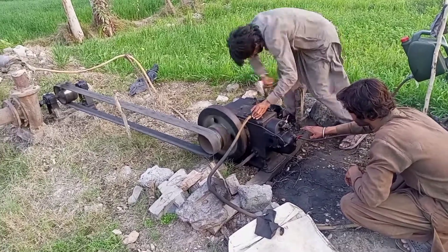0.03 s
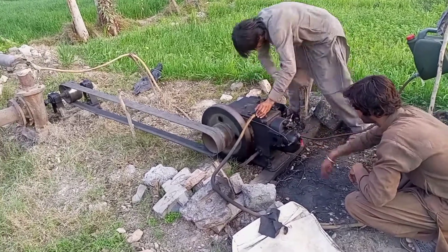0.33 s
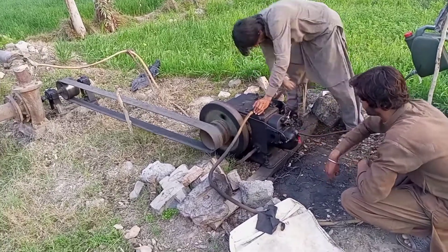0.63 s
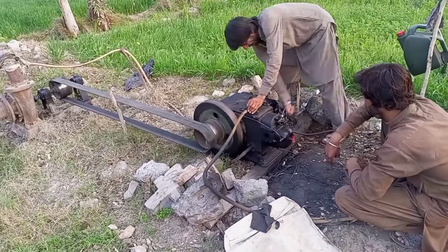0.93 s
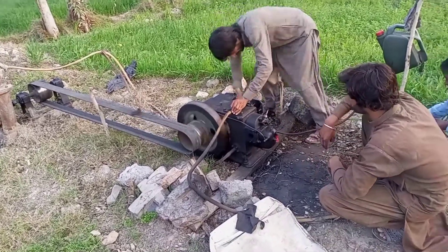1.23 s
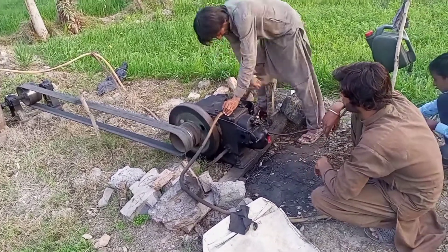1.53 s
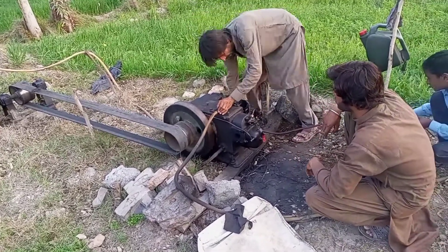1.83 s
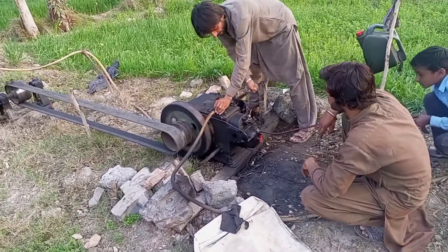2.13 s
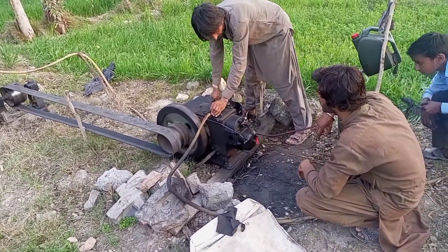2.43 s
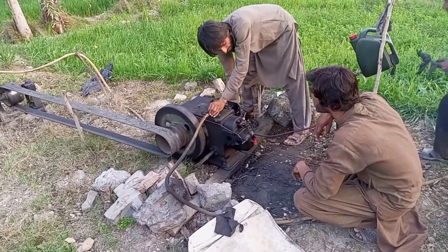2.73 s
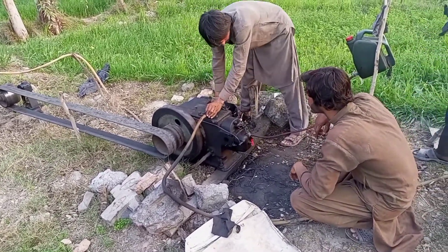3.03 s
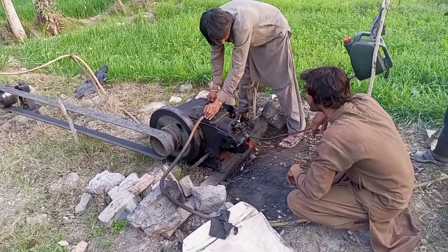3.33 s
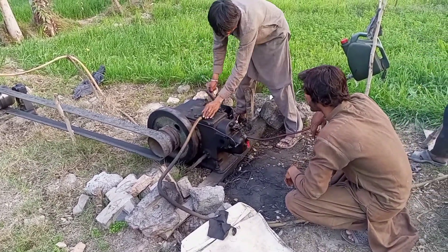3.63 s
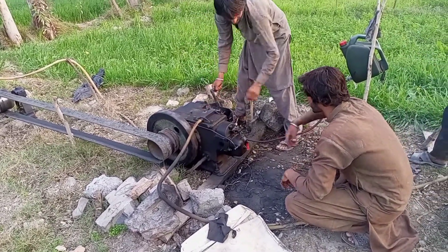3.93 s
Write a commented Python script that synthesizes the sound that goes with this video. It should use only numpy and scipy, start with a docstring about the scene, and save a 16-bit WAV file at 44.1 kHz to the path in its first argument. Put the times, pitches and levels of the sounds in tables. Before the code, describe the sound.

An old diesel engine turns over with hissing, rattling pulses, slows down and stalls.

```python
"""In a field, an old single-cylinder diesel turns over without firing, each cycle slower, and stalls
with a sharp puff and a low clunk. In every cycle air hisses and squeals past the valves, the exhaust
pipe thumps with a rising note, and loose parts knock and rattle. Now and then comes a hollow pop or
the squeak of a dry part. The flywheel scrapes faintly as it creeps to a stop; then only a faint
background hiss is left."""
import sys
import numpy as np
from scipy import signal
from scipy.fft import rfft, irfft
from scipy.io import wavfile
from scipy.ndimage import uniform_filter1d

SR = 44100
rng = np.random.default_rng(int(sys.argv[2]) if len(sys.argv) > 2 else 0)


def inscribe(sig):
    """Save sig as 16-bit PCM at rate SR to the path in sys.argv[1].

    A 1-D sig is mono; a 2-D sig holds one channel per row.
    Samples are clipped to [-1, 1] before scaling.
    """
    pcm = np.round(np.clip(np.atleast_2d(sig).T, -1, 1) * 32767)
    wavfile.write(sys.argv[1], SR, pcm.astype(np.int16))


N = 176400
T = np.arange(N) / SR

# how loudly the turning engine rattles (time [s], level [dB])
RATTLE_LEVEL = [(0, -25.5), (.9, -30), (1.12, -35.5), (1.3, -39), (1.52, -32.5), (1.8, -54), (2.05, -49.5),
                (2.25, -55), (2.7, -72.5)]
# tone of the rattle (frequency [Hz], level [dB])
RATTLE_TONE = [(270, -1.5), (600, -8.5), (1150, -1.5), (1500, -18.5), (2200, -13), (6000, -20),
               (15000, -38)]
# rushes of air (peak time [s], rise [s], fall [s], level [dB])
AIR_RUSHES = [(0.012, 0.018, 0.013, -14.5), (0.12, 0.006, 0.018, -15), (0.196, 0.002, 0.013, -11.5),
              (0.328, 0.014, 0.029, -12.5), (0.434, .005, 0.014, -22), (.475, 0.005, 0.055, -17.5),
              (.63, 0.029, 0.056, -13), (0.733, 0.011, 0.017, -13.5), (1.085, .022, 0.026, -17),
              (1.236, 0.0025, 0.02, -18.5), (1.517, 0.087, 0.025, -28.5), (1.667, 0.029, 0.03, -17.5),
              (1.891, 0.0083, 0.019, -20.5), (2.571, 0.003, 0.0099, -16.5)]
# tone of the rushing air (frequency [Hz], level [dB])
AIR_TONE = [(1600, -29.5), (2600, -12), (6000, -7), (10000, -5.5), (15500, -9.5)]
# knocks of loose parts (time [s], relative level [dB], extra level for the clink [dB])
KNOCKS = [(.010, -15.5, 1.5), (0.059, -14, 1), (0.12, -14.5, 0), (0.269, -12, -16), (0.432, -15, 2.5),
          (0.722, -8.5, -2), (0.809, -18, -28), (0.844, -11, -18.5), (0.855, -33, 18), (0.943, -11, -26),
          (0.983, -30, -5), (1.223, -13, -10), (1.33, -15.5, -10), (1.387, -19.5, 1.5), (1.486, -15.5, -10),
          (1.741, -28, -5.5), (1.768, -18.5, -40), (1.87, -23.5, 0.5), (2.022, -18, -39),
          (2.114, -27.5, 12), (2.277, -19, -1.5), (2.365, -46.5, 7), (2.572, -24.5, -14), (2.593, -22, -19),
          (2.715, -38, -36.5)]
# tone of a knock's dull body (frequency [Hz], level [dB])
BODY_TONE = [(290, -7.5), (620, -2.5), (1200, 4), (1550, -13.5), (2100, 1), (6000, -42.5)]
# tone of a knock's bright clink (frequency [Hz], level [dB])
CLINK_TONE = [(2100, -5), (3500, 2.5), (5500, -4), (15000, -27)]
# notes at which the iron casing rings (frequency [Hz], relative level [dB])
CASING_NOTES = [(640, -3.5), (1080, -7), (1276, 5), (2140, -10.5), (2490, 0.5), (3660, -4), (4280, -7.5)]
# harsh squeals at the valves, and last a faint whistling scrape (peak time [s], rise [s], fall [s], pitch [Hz],
# relative level [dB])
SQUEALS = [(.163, 0.0084, 0.02, 3570, -10), (.477, 0.0074, 0.034, 3613, -15),
           (.53, 0.022, .014, 3525, -17.5), (.712, 0.01, 0.019, 3080, -16.5),
           (1.358, 0.011, 0.021, 2930, -24.5), (1.4, 0.017, 0.033, 3704, -16),
           (1.461, 0.0038, 0.012, 3285, -16.5), (1.505, 0.034, 0.037, 3020, -21),
           (2.087, 0.011, 0.018, 2310, -36.5)]
# short hollow pops, then the low clunk of the stall (time [s], pitch [Hz], level [dB], fade time [s])
POPS_AND_CLUNK = [(0.1949, 926, -6, 0.0054), (1.138, 784, -26, 0.021), (2.575, 262, -23, .012),
                  (2.587, 347, -25.5, 0.0086)]
# thin squeaks of a dry part (peak time [s], rise [s], fall [s], pitch [Hz], relative level [dB])
SQUEAKS = [(.238, 0.015, 0.041, 6810, -15), (.552, 0.028, 0.056, 6780, -13),
           (.964, .014, 0.0085, 6790, -23), (1.005, 0.017, 0.035, 6710, -13.5),
           (1.973, 0.0095, 0.037, 6960, -22), (2.037, 0.018, 0.031, 6810, -24)]
# exhaust thumps (time [s], level [dB], time the note takes to rise [s], level of the held note [dB])
THUMPS = [(0.337, -7, 0.038, -22), (0.741, -8, 0.13, -58), (1.245, -8.5, 0.086, -26.5),
          (1.894, -10.5, 0.15, -23.5)]
# scrapes of the flywheel (peak time [s], rise [s], fall [s], level [dB])
SCRAPES = [(2.256, 0.011, 0.02, -37), (2.54, 0.029, 0.098, -41.5), (2.803, 0.017, 0.018, -56.5)]
# tone of the scrapes (frequency [Hz], level [dB])
SCRAPE_TONE = [(2500, -14), (4800, 2), (8000, -16), (15000, -20)]
# tone of the background hiss (frequency [Hz], level [dB])
BACKGROUND_TONE = [(105, 0), (300, -21), (1250, -10), (7000, -30), (10000, -24.5), (15000, -40)]
# the background hiss, with a small swell from the recorder's gain (time [s], level [dB])
BACKGROUND_LEVEL = [(2.86, -58.5), (2.92, -55), (4, -61)]


def gain(db):
    """Turn decibels into a number to multiply by."""
    return 10 ** (np.asarray(db) / 20)


def unit(x):
    """Scale a signal to an average strength (rms) of 1."""
    return x / np.sqrt(np.mean(x ** 2))


def noise():
    """A plain, even hiss: white noise."""
    return rng.standard_normal(N)


def colour(x, tone):
    """Shape x by a tone table, fading out below its lowest frequency; strength 1."""
    hz, db = np.array(tone).T
    freqs = np.maximum(np.arange(N // 2 + 1) * SR / N, 1)
    curve = gain(np.interp(np.log(freqs), np.log(hz), db))
    bass_cut = np.minimum(freqs / hz[0], 1) ** 2
    return unit(irfft(rfft(x) * curve * bass_cut, N))


def wobble(per_s):
    """A smooth random curve of strength 1 that changes about per_s times a second."""
    width = max(int(SR / per_s), 1)
    return unit(uniform_filter1d(uniform_filter1d(noise(), width), width))


def flutter(db, per_s):
    """A quick flicker of loudness, at most db up or down."""
    return gain(db * np.tanh(wobble(per_s)))


def fader(levels):
    """A loudness curve through a table of times and levels."""
    return gain(np.interp(T, *np.array(levels).T))


def strike(start, attack, decay):
    """The loudness of a hit: a straight climb, then a fade."""
    age = T - start
    return np.clip(age / attack, 0, 1) * np.exp(-np.maximum(age - attack, 0) / decay)


def swell(peak, rise, fall):
    """A rounded rise and fall around a peak time."""
    return np.exp(-((T - peak) / np.where(T < peak, rise, fall)) ** 2)


def clatter(per_s, decay_s):
    """Short bursts of noise at random times, some far louder than others; strength 1."""
    hits = (rng.random(N) < per_s / SR) * rng.exponential(size=N) ** 1.5
    power = np.abs(signal.fftconvolve(hits, np.exp(-T / decay_s))[:N])
    return unit(noise() * np.sqrt(power))


def whistle(table, harmonics_db, sag_per_s, wander, jitter, fray, brighten):
    """Sputtering shrill tones that sag in pitch; harmonics are whole multiples of that pitch."""
    waver = 1 + wander * wobble(90) + jitter * wobble(900)
    sputter = unit(flutter(5.5, 220) * flutter(3, 1400))
    slips = [fray * k * wobble(900) for k in range(len(harmonics_db))]  # roughen the upper harmonics
    out = 0
    for peak, rise, fall, hz, db in table:
        pitch = hz * waver * (1 - sag_per_s * (T - peak))
        phase = 2 * np.pi * np.cumsum(pitch) / SR
        size = np.sqrt(2) * gain(db) * swell(peak, rise, fall)
        for k, harmonic_db in enumerate(harmonics_db):
            out += gain(harmonic_db) * size ** (1 + brighten * k) * np.sin((k + 1) * phase + slips[k])
    return out * sputter


def rattle():
    """Loose parts jostle in dense, blunt clacks that die away as the engine slows."""
    return colour(clatter(per_s=210, decay_s=0.0052), RATTLE_TONE) * fader(RATTLE_LEVEL)


def air(tail_db=-28, tail_s=0.017):
    """Air forced through a narrow gap swells and fades as a raspy, spitting hiss."""
    power = 0
    for peak, rise, fall, db in AIR_RUSHES:
        tail = gain(tail_db) * strike(peak, fall, tail_s)
        power += (gain(db) * (swell(peak, rise, fall) + tail)) ** 2
    spitting = clatter(per_s=700, decay_s=0.0007)
    return np.sqrt(power) * colour(noise() + 0.9 * spitting, AIR_TONE)


def knocks(body_db=-11.5, clink_db=-9, grain_db=2, tail_db=-22, attack_s=0.0013):
    """Loose parts hit in a short chatter: each knock has a dull body and a bright clink."""
    body, clink = 0, 0
    for start, db, extra_db in KNOCKS:
        fade = strike(start, attack_s, decay=0.011) + gain(tail_db) * strike(start, attack_s, decay=0.013)
        body += gain(db + body_db) * fade
        clink += gain(db + clink_db + extra_db) * fade
    chatter = noise() * gain(grain_db * wobble(900))
    return body * colour(chatter, BODY_TONE) + clink * colour(chatter, CLINK_TONE)


def casing(blows, ring_s=0.065, ring_db=-7):
    """The iron casing adds its short ring to whatever strikes it."""
    notes = sum(gain(db) * np.cos(2 * np.pi * hz * T) for hz, db in CASING_NOTES)
    ring = notes * gain(-60 * T / ring_s)
    return blows + gain(ring_db) * signal.fftconvolve(blows, ring / np.linalg.norm(ring))[:N]


def echo(x, delay_s=0.00184, share=0.45, above_hz=1700):
    """A hard surface close by sends the high sounds back a moment later."""
    treble = signal.sosfiltfilt(signal.butter(2, above_hz, "high", fs=SR, output="sos"), x)
    return x + share * np.interp(T - delay_s, T, treble)


def squeals():
    """Air squeals harshly past the valves, sinking in pitch as the pressure drops; the same voice also gives
    one faint whistling scrape late on."""
    return whistle(SQUEALS, harmonics_db=[-3, -3.5, -4, -7.5], sag_per_s=1.4,
                   wander=0.02, jitter=0.042, fray=0.55, brighten=0)


def pops_and_clunk(attack_s=0.0045):
    """Quickly fading notes: short hollow pops, and the low clunk as the engine stalls."""
    return sum(gain(db) * strike(start, attack_s, decay) * np.sin(2 * np.pi * hz * (T - start))
               for start, hz, db, decay in POPS_AND_CLUNK)


def squeaks():
    """A dry part rubs with a thin squeak that gets brighter as it gets louder."""
    return whistle(SQUEAKS, harmonics_db=[0, 4], sag_per_s=0.29,
                   wander=0.004, jitter=0.006, fray=0.6, brighten=1.5)


def thumps(pipe_hz=146, rise_octaves=0.8):
    """A valve opens and the exhaust pipe booms; its note rises as the piston shrinks the cylinder."""
    out, unsteady = 0, flutter(4, 110)
    for start, db, rise, held_db in THUMPS:
        stroke = np.clip((T - start) / rise, 0, 1)  # the piston's travel, from 0 to 1
        hz = pipe_hz * 2 ** (rise_octaves * stroke ** 1.7)
        note = np.sin(2 * np.pi * np.cumsum(hz * (T > start)) / SR)
        boom = gain(db) * strike(start, attack=0.0047, decay=0.01)
        held = gain(held_db) * np.sqrt(np.abs(np.sin(np.pi * stroke))) * unsteady
        out += (boom + held) * note
    return out


def scrapes():
    """Dry metal rubs in faint, grainy strokes as the flywheel creeps and rocks back."""
    strokes = sum(gain(db) * swell(peak, rise, fall) for peak, rise, fall, db in SCRAPES)
    return strokes * colour(noise(), SCRAPE_TONE) * flutter(2.7, 247)


def background():
    """A faint hiss that swells at a set time, as when a recorder's automatic gain comes up."""
    return colour(noise(), BACKGROUND_TONE) * fader(BACKGROUND_LEVEL)


def scene():
    """The engine close by and the background hiss, mixed into one channel."""
    noisy_parts = rattle() + air() + casing(knocks()) + squeals() + scrapes()
    return (echo(noisy_parts) + pops_and_clunk() + squeaks() + thumps() + background())[None]


def record(dry, bottom_hz=45, top_hz=15900):
    """Thin the deep bass, clip any peak beyond full scale and cut the very highest sounds."""
    bass_cut = signal.butter(2, bottom_hz, "high", fs=SR, output="sos")
    top_cut = signal.ellip(10, 0.2, 70, top_hz, fs=SR, output="sos")
    clipped = np.clip(signal.sosfilt(bass_cut, dry), -1, 1)
    return signal.sosfilt(top_cut, clipped)


dry = scene()
out = record(dry)
inscribe(out)
```